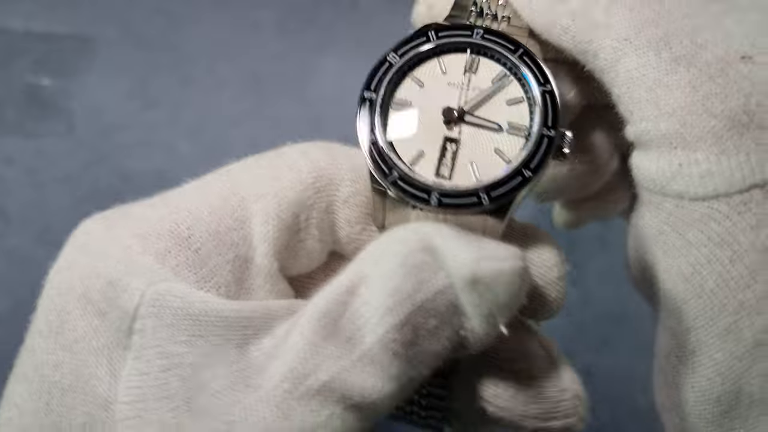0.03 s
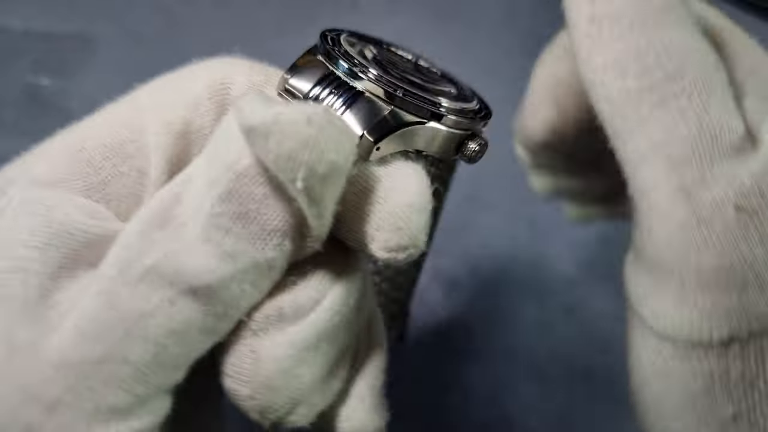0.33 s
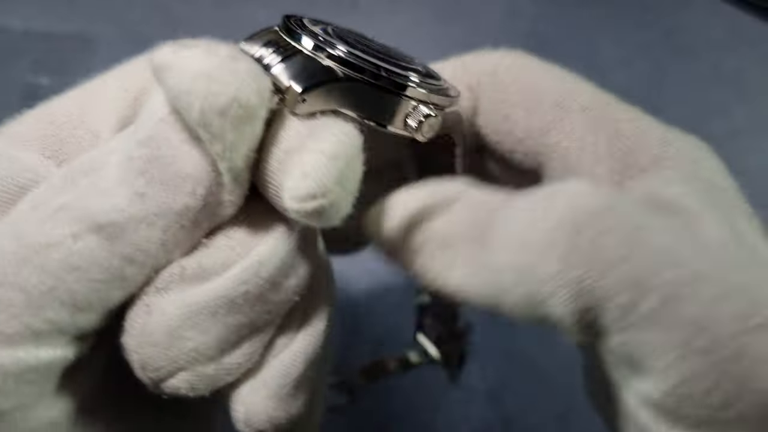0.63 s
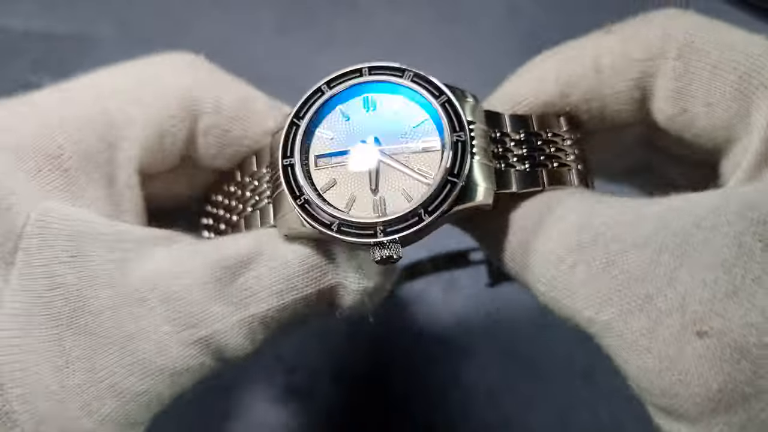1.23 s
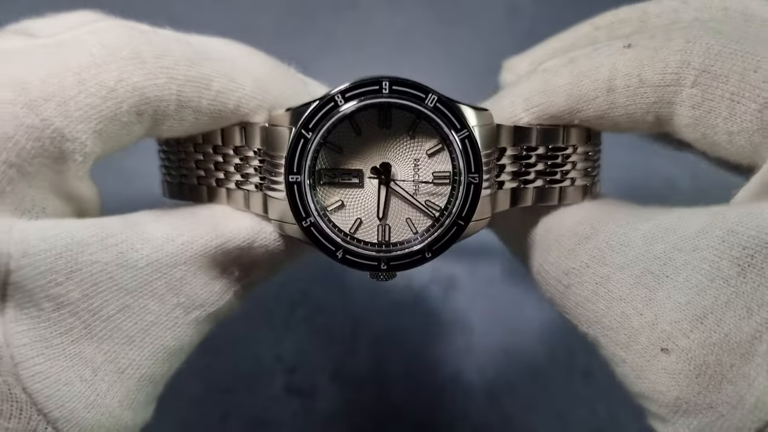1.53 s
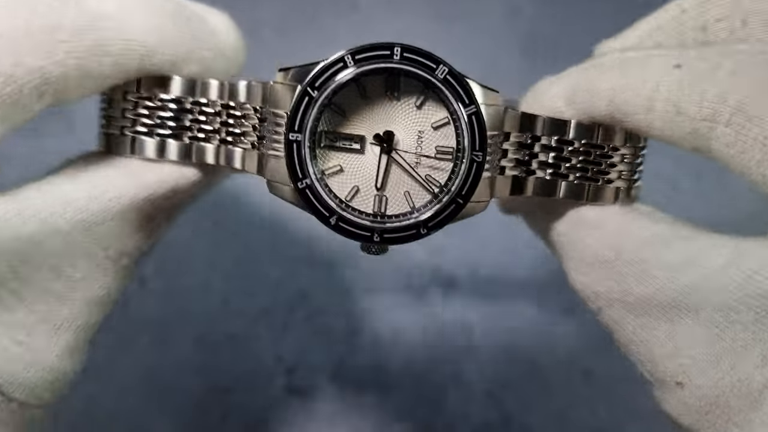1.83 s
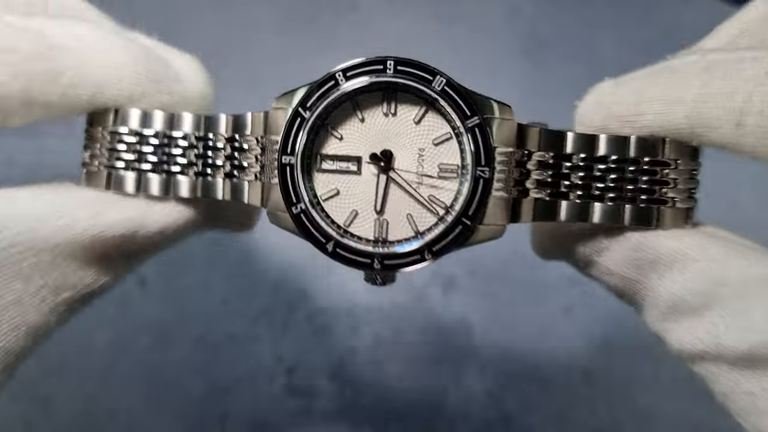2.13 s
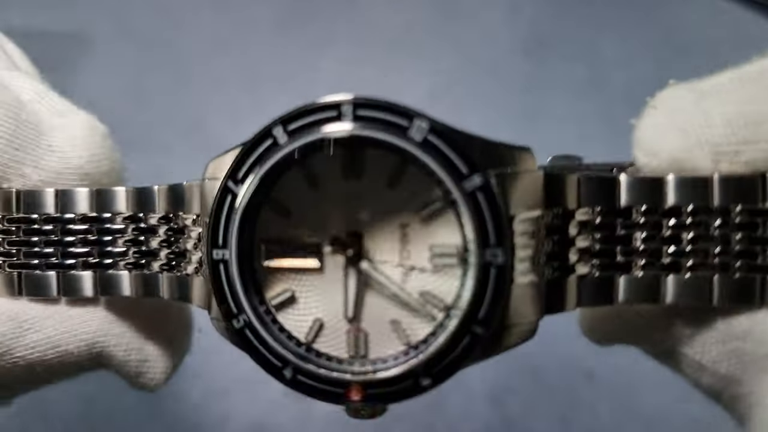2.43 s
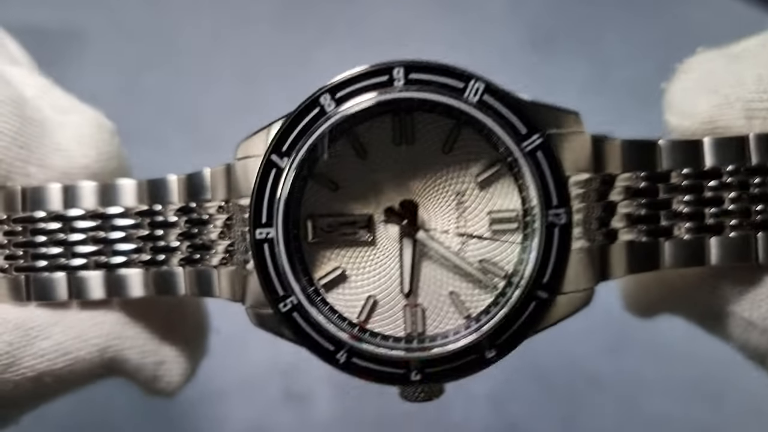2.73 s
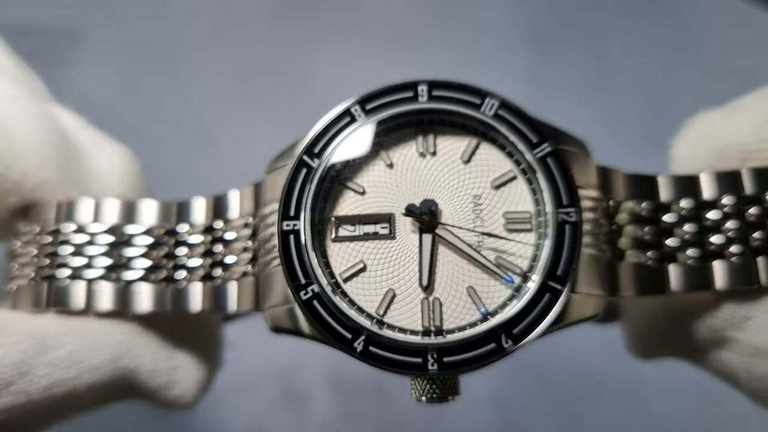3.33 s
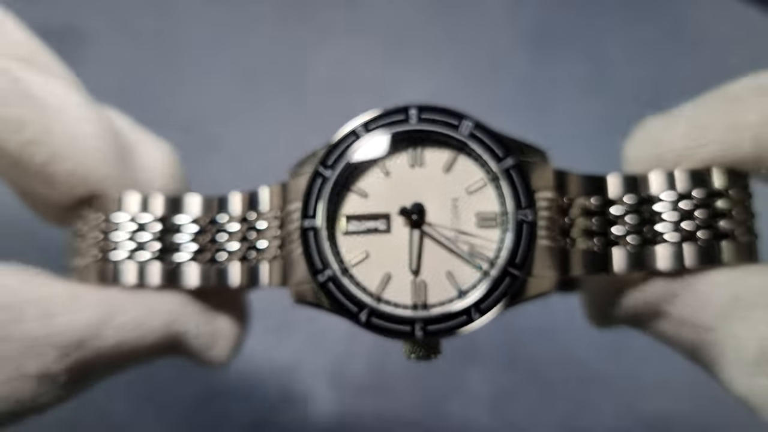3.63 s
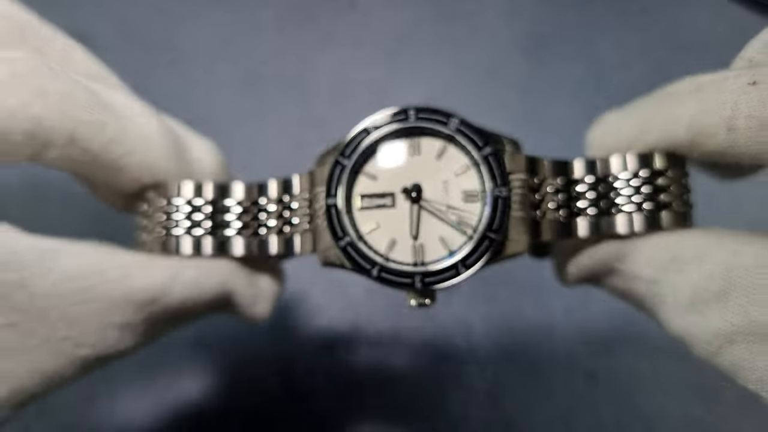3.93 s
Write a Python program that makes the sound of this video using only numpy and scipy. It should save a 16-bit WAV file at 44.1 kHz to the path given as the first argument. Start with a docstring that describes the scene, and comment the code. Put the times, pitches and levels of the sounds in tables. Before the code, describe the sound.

Metal watch band and clasp rattle briefly in gloved hands, then tick faintly.

```python
"""A quiet room, close to the microphone: gloved hands turn a steel watch over a bed of appliance hum
and fan noise. The loose bracelet swings and its clasp clacks twice, with smaller link clicks after each
clack; then the band is pulled straight with a few faint ticks. Each hit is a chatter of steel contacts
that rings the links and, when hard, the clasp. Around the hits, links scrape and sing, cotton rubs
and the hands make soft bumps, all with quick desk reflections and a short room tail."""
import sys
import numpy as np
from scipy import signal
from scipy.fft import rfft, irfft
from scipy.io import wavfile
from scipy.ndimage import uniform_filter1d

SR = 44100
rng = np.random.default_rng(int(sys.argv[2]) if len(sys.argv) > 2 else 0)


def file_out(sig):
    """Save sig as 16-bit WAV at sys.argv[1]."""
    # one column per channel
    cols = np.atleast_2d(sig).T
    # limit, then scale
    lim = np.clip(cols, -1, 1)
    pcm = np.round(lim * 32767).astype(np.int16)
    wavfile.write(sys.argv[1], SR, pcm)


N = 176400

# tone of the fan noise and microphone hiss: freq_hz, relative_db
AIR_EQ = [(28, -75), (40, -82), (53, -71.5), (80, -80.5), (105, -86), (290, -86.5), (400, -94), (620, -99),
          (740, -95), (870, -99), (1000, -92), (1170, -93.5), (1420, -99), (1600, -109), (1920, -101),
          (2400, -110), (3200, -116), (5500, -122), (7800, -121), (8600, -126), (11000, -127),
          (12400, -117), (15600, -116), (16100, -140)]
# stereo width of the air: freq_hz, left_right_correlation
AIR_CORRELATION = [(60, 0.9), (200, 1), (350, -0.083), (520, -0.5), (1100, -0.79), (1600, -0.18),
                   (6000, -0.09)]
# stereo lean of the air: freq_hz, left_minus_right_db
AIR_PAN = [(200, 5), (700, -1), (15000, -3)]
# swells of the deep drone: time_s, level_db
DRONE_LEVELS = [(0, -47), (.6, -46), (1.15, -50), (1.39, -45.5), (1.48, -50.5), (1.9, -45.5), (2.62, -52),
                (2.83, -47), (3.2, -50.5), (3.42, -47), (4, -48.5)]
# appliance tones: pitch_hz, level_db, waver_share, left_minus_right_db, left_lead_rad
HUM_TONES = [(117.55, -66.5, 0.21, -3.5, 0.81), (150, -72.5, 0.59, -3.5, 0.5),
             (224.8, -58, 0.24, 1.5, 0.45), (293.7, -61, 0.18, -0.5, -1.11), (588, -84.5, 0.83, -14, 2.1)]
# thin whines: pitch_hz, width_hz, level_db
WHINES = [(1905, 26, -81), (8040, 41, -84.5)]
# length of the room tail: freq_hz, t60_s
ROOM_DECAY = [(500, 0.41), (8000, 0.18), (15000, .16)]
# dull handling bumps: start_s, pitch_hz, width_hz, level_db, swell_s
BUMPS = [(1.5, 1350, 110, -74.5, .12), (1.925, 715, 45, -66, .016), (2.015, 310, 60, -60, .016),
         (3.09, 840, 170, -61, .006), (3.104, 740, 40, -64, .012)]
# fader ride of the gloves on the band: time_s, level_db
GLOVE_LEVELS = [(0, -84), (0.28, -78), (0.4, -64), (0.53, -69.5), (0.61, -84), (0.74, -63), (0.9, -72.5),
                (1.22, -76), (1.38, -74.5), (1.55, -83.5), (1.87, -82.5), (1.95, -72), (2.08, -81),
                (2.6, -85), (4, -97)]
# tone of rubbing cotton: freq_hz, relative_db
COTTON_EQ = [(300, -1.5), (2500, -2), (4000, -1), (7000, -3), (10500, -16.5), (14500, 2.5), (16000, -24)]
# tone of steel on steel: freq_hz, relative_db
STEEL_EQ = [(300, -8.5), (1500, -20), (2400, -12), (3000, -4.5), (5100, -5), (6500, 3), (8300, 3),
            (10500, -3), (12700, 1), (15500, 2), (16300, -26)]
# links sliding over each other: centre_s, fade_s, level_db
SLIDES = [(0.342, 0.016, -68), (0.438, .006, -54), (0.68, 0.0059, -47), (0.785, 0.011, -56)]
# single links that sing briefly: start_s, pitch_hz, level_db, swell_s
PINGS = [(0.45, 3460, -58, 0.0055), (0.726, 6430, -57.5, 0.0054), (0.959, 5900, -61, 0.006),
         (1.325, 9610, -55.5, 0.0018), (1.435, 5030, -65, 0.0028), (1.94, 4230, -62.5, 0.0066),
         (2.201, 4780, -62.5, 0.0017)]
# resonances of the links: offset_from_ring_hz, relative_db, t60_s
LINK_MODES = [(-480, 4, 0.0048), (-32, -22, 0.017), (389, 12.5, 0.0074)]
# resonances of the clasp: pitch_hz, relative_db, t60_s
CLASP_MODES = [(2880, -7, .022), (3130, -5.5, .028), (3480, -11, .025), (4050, -3, .033), (4550, -12, .02),
               (6970, -12, .025), (8300, -12, .025)]
# link and clasp hits: start_s, strength_db, body_gain_db, ring_gain_db, chatter_decay_s, ring_hz
HITS = [(0.333, -57, 5.5, 5, 0.0015, 14600), (0.4047, -34, -3.5, 11.5, 0.0012, 13950),
        (0.4071, -32.5, 0.5, 5, 0.0019, 14500), (0.4125, -46, -1, 0, .0024, 14000),
        (0.4662, -41.5, -12, -7, 0.002, 14200), (0.4728, -49, -19, -4, 0.002, 14200),
        (0.669, -56, 2, -10, .0012, 14000), (0.7596, -32.5, 2.5, 3.5, 0.0015, 14350),
        (0.7647, -42.5, -1, 8, 0.0015, 14700), (0.7694, -39.5, 2, 7, 0.0017, 15000),
        (0.812, -45.5, -4, 2, 0.0013, 14700), (0.834, -44.5, 6.5, -9, 0.0016, 14500),
        (0.8428, -54, 11, -4, 0.0012, 14700), (0.8816, -47, 3, -12, 0.00074, 14700),
        (0.9145, -53.5, 15, 2, 0.00082, 14500), (0.9171, -48.5, -2, -8, 0.0013, 14400),
        (1.226, -64, 7.5, -22, 0.0045, 14500), (1.915, -59, 0, -13, 0.00096, 14600),
        (1.991, -69.5, 20.5, -10, 0.0018, 14400), (2.026, -73, 22, -16, 0.0014, 14500),
        (2.2048, -67.5, 9, 9, 0.0022, 14400)]


def amp(db):
    return 10 ** (np.asarray(db) / 20)


def unit_rms(x):
    return x / np.sqrt(np.mean(abs(x) ** 2) + 1e-30)


def match_energy(sound, envelope, axis=None):
    """Gives a sound the energy of an envelope: in total, or per channel with axis=1."""
    return sound * np.linalg.norm(envelope) / np.linalg.norm(sound, axis=axis, keepdims=True)


def curve_at(points, hz):
    """Reads a curve along a log frequency axis."""
    point_hz, value = np.transpose(points)
    return np.interp(np.log(hz + 1), np.log(point_hz + 1), value)


def pan(left_minus_right_db):
    """Left and right gains of constant power."""
    return unit_rms(amp(np.array([[0.5], [-0.5]]) * left_minus_right_db))


def place(mix, start_s, sound):
    part = mix[:, max(round(start_s * SR), 0):][:, :sound.shape[-1]]
    part += sound[..., :part.shape[1]]


def colour(x, eq):
    """Applies an EQ curve and brings the result to unit RMS."""
    hz = np.fft.rfftfreq(x.shape[-1], 1 / SR)
    return unit_rms(irfft(rfft(x) * amp(curve_at(eq, hz)), x.shape[-1]))


def causal_eq(x, gain_db):
    """Minimum-phase EQ from gains on an even frequency grid; keeps attacks free of pre-ring."""
    log_gain = np.log(amp(np.r_[gain_db, gain_db[-2:0:-1]]))
    taps = np.fft.ifft(np.exp(np.conj(signal.hilbert(log_gain)))).real
    return signal.fftconvolve(x, taps[None], axes=1)[:, :x.shape[1]]


def noise_band(pitch_hz, width_hz):
    """Stereo noise in one resonance."""
    offset = (np.fft.rfftfreq(N, 1 / SR) - pitch_hz) / width_hz
    return unit_rms(irfft(rfft(rng.standard_normal((2, N))) / (1 + (1.3 * offset) ** 2), N))


def room_air(level_db=-55.5, flicker_db=1.47):
    """Steady fan noise over microphone hiss, flickering slightly in patches of the spectrum."""
    frames, hz = N // 512 + 5, np.fft.rfftfreq(2048, 1 / SR)
    left_re, left_im, apart_re, apart_im, patches = rng.standard_normal((5, frames, len(hz)))
    patches = uniform_filter1d(patches, size=6, axis=0)
    patches = unit_rms(uniform_filter1d(patches, size=14, axis=1))
    correlation, lean_db = curve_at(AIR_CORRELATION, hz), curve_at(AIR_PAN, hz) / 2
    left = left_re + 1j * left_im
    right = correlation * left + np.sqrt(1 - correlation ** 2) * (apart_re + 1j * apart_im)
    spectra = np.array([left * amp(lean_db), right * amp(-lean_db)])
    spectra *= amp(curve_at(AIR_EQ, hz) + flicker_db * patches)
    air = signal.istft(spectra.transpose(0, 2, 1), nperseg=2048, noverlap=1536)[1][:, :N]
    return amp(level_db) * unit_rms(air)


def appliance_hum(drone_hz=50.42, waver_hz=10):
    """Appliances lay down a deep swelling drone, wavering tones and thin whines."""
    t, hz = np.arange(N) / SR, np.fft.fftfreq(N, 1 / SR)
    swell = np.sqrt(2) * amp(np.interp(t, *np.transpose(DRONE_LEVELS)))
    out = swell * pan(1.0) * np.sin(2 * np.pi * (drone_hz * t + rng.random()))
    for pitch_hz, level_db, waver, pan_db, lead_rad in HUM_TONES:
        drift = unit_rms(np.fft.ifft(np.exp(2j * np.pi * rng.random(N)) / (1 + (hz / waver_hz) ** 2)))
        tone = (1 + waver * drift) * np.exp(2j * np.pi * (pitch_hz * t + rng.random()))
        stereo = np.array([tone * np.exp(1j * lead_rad), tone]).real
        out += np.sqrt(2) * amp(level_db) * pan(pan_db) * stereo
    return out + sum(amp(db) * noise_band(pitch_hz, width_hz) for pitch_hz, width_hz, db in WHINES)


def small_room(dry, desk_db=-6.5, desk_decay_s=0.0038, tail_db=-8.5, size=16384):
    """Adds quick reflections from the desk and hands, then the short tail of a small room."""
    t = np.arange(size) / SR
    # sparse echoes after a 2 ms pre-delay
    early, late = rng.standard_normal((2, 2, size)) * (rng.random((2, 2, size)) < .15) * (t > .002)
    desk = unit_rms(early * np.exp(-t / desk_decay_s))
    hz, frame_s, spectra = signal.stft(late, SR, nperseg=256)
    spectra *= amp(-60 * frame_s / curve_at(ROOM_DECAY, hz)[:, None])
    tail = unit_rms(signal.istft(spectra, SR, nperseg=256)[1][:, :size])
    response = (amp(desk_db) * desk + amp(tail_db) * tail) / np.sqrt(size)
    return dry + signal.fftconvolve(dry, response, axes=1)[:, :N]


def handling_bumps(pan_db=-2):
    """Soft bumps and rubs of the hands: muffled bands of noise that swell and fade."""
    out, t = np.zeros((2, N)), np.arange(N) / SR
    for start_s, pitch_hz, width_hz, level_db, swell_s in BUMPS:
        swell = t / swell_s * np.exp(1 - t / swell_s)
        bump = match_energy(noise_band(pitch_hz, width_hz) * swell, swell, axis=1)
        place(out, start_s, amp(level_db) * pan(pan_db) * bump)
    return out


def band_friction(steel_grain=1.3, cotton_grain=0.9, ticks_per_s=200, jiggle_db=-3, pan_db=-3):
    """Grainy scrapes of steel links, the soft rub of gloves and tiny ticks of the links they jiggle."""
    t = np.arange(N) / SR
    clumps = np.tanh(unit_rms(uniform_filter1d(rng.standard_normal(N), size=60)))
    scrape, rub, tick = rng.standard_normal((3, 2, N))
    slide_level = sum(amp(db) * np.exp(-abs(t - centre_s) / fade_s) for centre_s, fade_s, db in SLIDES)
    glove_level = amp(np.interp(t, *np.transpose(GLOVE_LEVELS)))
    steel = colour(scrape * np.exp(steel_grain * clumps), STEEL_EQ)
    cotton = colour(rub * np.exp(cotton_grain * clumps), COTTON_EQ)
    contacts = (rng.random(N) < ticks_per_s / SR) * amp(12 * rng.random(N))  # spread over 12 dB
    jiggle = amp(jiggle_db) * colour(tick * uniform_filter1d(contacts, size=24), STEEL_EQ)
    return pan(pan_db) * (slide_level * steel + glove_level * (cotton + jiggle))


def link_pings(width_hz=130, pan_db=-2, size=4000):
    """A link slips on its pin and scrapes roughly around one note."""
    out, t = np.zeros((2, N)), np.arange(size) / SR
    for start_s, pitch_hz, level_db, swell_s in PINGS:
        swell = (t / swell_s) ** 2 * np.exp(2 - 2 * t / swell_s)
        ping = match_energy(noise_band(pitch_hz, width_hz)[:, :size] * swell, swell)
        place(out, start_s, amp(level_db) * pan(pan_db) * ping)
    return out


def steel_ring(modes, t, detune=.025):
    """Struck steel rings out, a little detuned on each hit, with its own phase at each microphone."""
    out = np.zeros((2, len(t)))
    for pitch_hz, level_db, t60_s in modes:
        cycles = pitch_hz * (1 + detune * rng.standard_normal()) * t + rng.random((2, 1))
        out += amp(level_db - 60 * t / t60_s) * np.sin(2 * np.pi * cycles)
    return out


def bracelet_clacks(steel_db=8, clasp_db=-5, links_db=4, full_hit_db=-40, size=6000):
    """Each hit is a short chatter of tiny contacts that rings the links; hard hits ring the clasp too."""
    attack_s, grain, body_hz, body_pan_db = 0.00028, 0.5, 5300, -2.5
    out, t, hz = np.zeros((2, N)), np.arange(size) / SR, np.fft.rfftfreq(1024, 1 / SR)
    attack = 1 - np.exp(-(t / attack_s) ** 2)
    for start_s, strength_db, body_gain_db, ring_gain_db, decay_s, ring_hz in HITS:
        decay = np.exp(-t / decay_s)
        envelope = attack * decay
        grit = rng.standard_normal((2, size)) * np.exp(grain * np.tanh(rng.standard_normal(size)))
        chatter = match_energy(grit * envelope, envelope, axis=1)
        link_ring = steel_ring(np.add(LINK_MODES, [ring_hz, 0, 0]), t)
        links = signal.fftconvolve(chatter * decay, link_ring, axes=1)[:, :size]
        links = amp(links_db + ring_gain_db) * match_energy(links, envelope, axis=1)
        link_pan_db = -7.5 - 0.82 * max(ring_gain_db, 0)  # links facing the right mic ring loudest
        light_hit_db = 1.2 * min(strength_db - full_hit_db, 0)  # light hits barely wake the clasp
        clasp = amp(clasp_db + light_hit_db) * attack * steel_ring(CLASP_MODES, t)
        click = amp(steel_db) * causal_eq(chatter, curve_at(STEEL_EQ, hz))
        body = causal_eq(click + clasp, body_gain_db / (1 + (hz / body_hz) ** 6))  # low shelf
        place(out, start_s, amp(strength_db) * (pan(body_pan_db) * body + pan(link_pan_db) * links))
    return out


def scene():
    """The watch foley in its room, over the bed of hum and air."""
    foley = bracelet_clacks() + link_pings() + band_friction() + handling_bumps()
    return small_room(foley) + appliance_hum() + room_air()


def record(dry):
    """A steep high cut at 16.2 kHz."""
    high_cut = signal.firwin(255, 16200, window=("kaiser", 9), fs=SR)
    return signal.oaconvolve(dry, high_cut[None], "same")


dry = scene()
out = record(dry)
file_out(out)
```